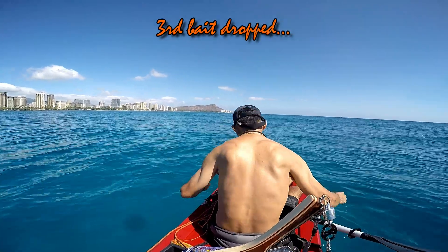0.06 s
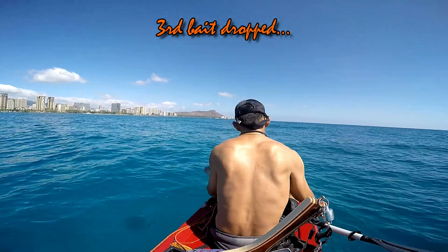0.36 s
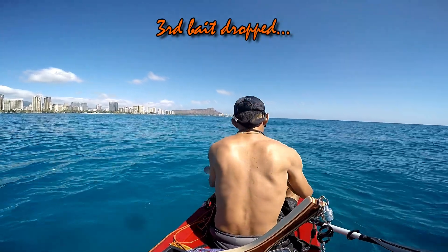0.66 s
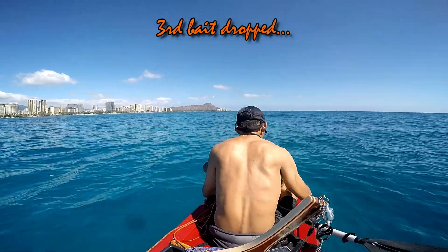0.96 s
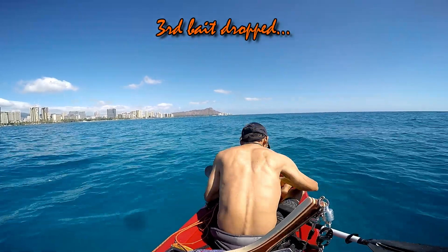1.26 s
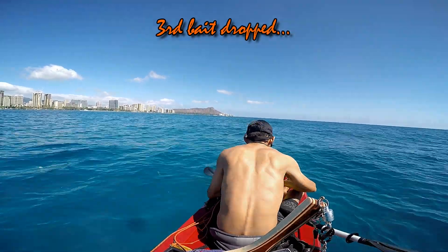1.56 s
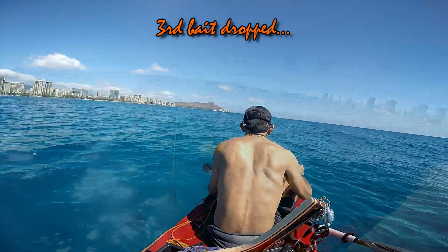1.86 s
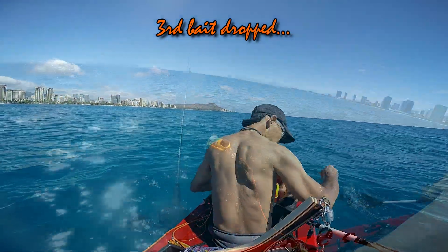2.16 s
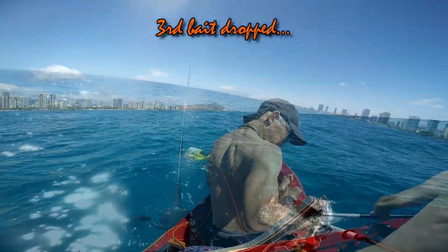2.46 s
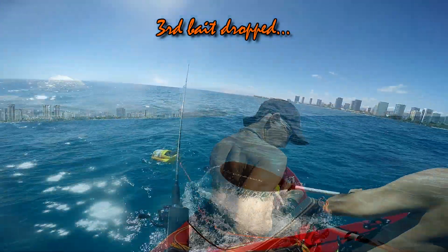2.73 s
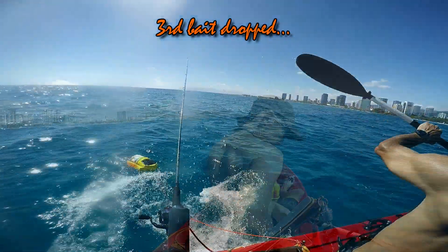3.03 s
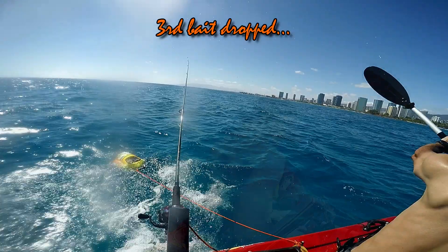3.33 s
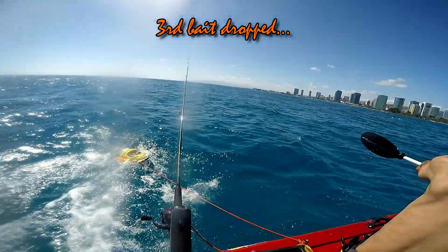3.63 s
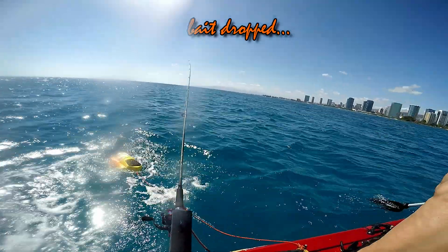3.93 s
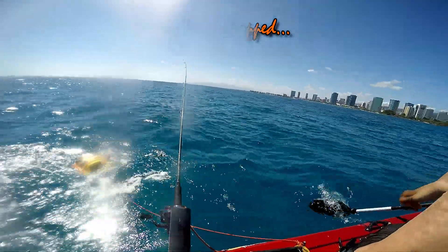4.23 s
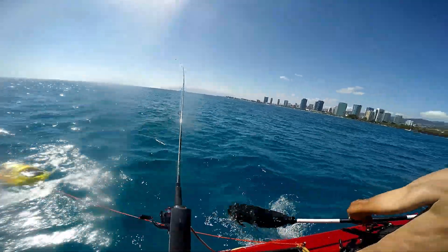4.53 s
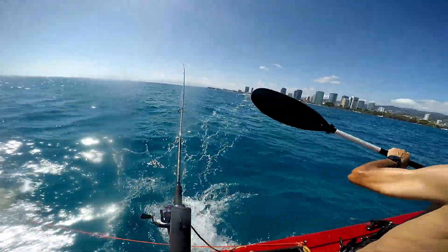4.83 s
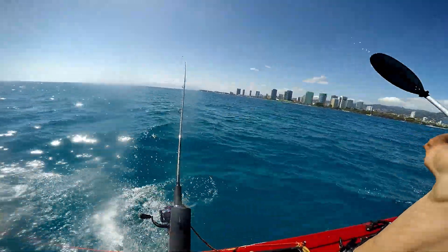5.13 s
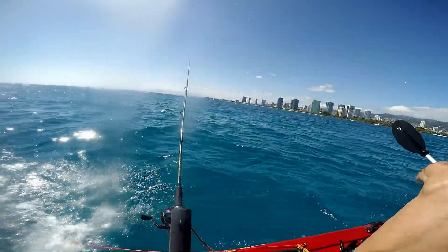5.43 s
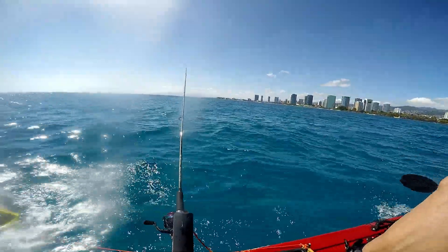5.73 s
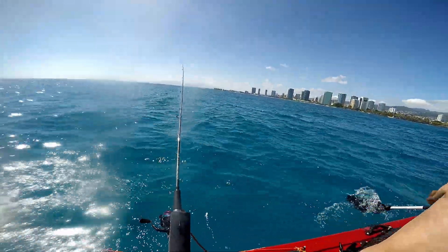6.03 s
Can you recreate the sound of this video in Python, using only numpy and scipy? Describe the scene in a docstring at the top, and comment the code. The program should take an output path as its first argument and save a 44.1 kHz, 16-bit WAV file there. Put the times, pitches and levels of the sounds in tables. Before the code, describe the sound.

Wavelets lap at a drifting plastic kayak, then an abrupt change to paddling, with splashes, gurgling water and hollow hull thumps.

```python
"""Wavelets lap and gear knocks on the deck of a drifting plastic kayak, out at sea.
The scene cuts abruptly to the kayak already being paddled: water churns and gurgles along the hollow
hull, spray fizzes, and the paddle and the chop thump the shell. The water sounds through ringing
bubbles, the hull through its struck modes. All is heard close up, from the microphone of a camera in a
waterproof case fixed to the stern; the camera itself whines faintly."""
import sys
import numpy as np
from scipy import signal
from scipy.fft import rfft, irfft, next_fast_len
from scipy.io import wavfile

SR = 44100
rng = np.random.default_rng(int(sys.argv[2]) if len(sys.argv) > 2 else 0)


def put_to_file(sound):
    """Save the sound as 16-bit audio at rate SR, in the file named by the first command-line argument."""
    columns = np.atleast_2d(sound).T  # one column per channel
    safe = np.clip(columns, -1, 1)
    whole_steps = np.round(safe * 32767)
    wavfile.write(sys.argv[1], SR, whole_steps.astype(np.int16))


N = 268128
TIME = np.arange(N) / SR
SCENE_CUT_S = 2.487  # abrupt cut from drifting to the kayak already being paddled
CUTOFF_HZ = 15600  # top of the microphone's range

# swells that shove the hull, then heave under it: (time [s], level [dB], pitch [Hz], length [s])
SWELLS = [(0.0, -22.5, 39.8, 0.093), (0.352, -20.5, 45, 0.32), (0.526, -21, 36, 0.096),
          (0.767, -18.5, 88, 0.083), (0.956, -21.5, 75.6, 0.046), (1.216, -23.5, 54, 0.02),
          (1.422, -20.5, 71, 0.12), (1.537, -19, 38, 0.22), (2.203, -15.5, 60.3, 0.19),
          (2.75, -15, 193, 0.041), (2.775, -8, 110, 0.093), (3.226, -6, 70, 0.085),
          (3.258, -12.5, 55.4, 0.17), (3.676, -15.5, 80, 0.4), (3.978, -17, 139, 0.068),
          (4.784, -5.5, 71.6, 0.11), (4.886, -9.5, 102.2, 0.28), (5.447, -13, 64.4, .08)]
# water thrown by the paddle: (peak time [s], spray level [dB], large drops re spray [dB],
# fizz re spray [dB], build-up [s], fall [s], pitch of the commonest drops [Hz])
SPLASHES = [(2.82, -47, -2.5, -10.5, 0.54, 0.32, 4540), (3.89, -52, 3, -14.5, 0.38, 0.22, 3930),
            (4.74, -51.5, -0.5, -11.5, 0.41, 0.18, 4700), (5.02, -49, -4.5, -7.5, 0.19, 0.2, 4100),
            (5.4, -51.5, -0.5, -8, 0.048, 0.14, 5150), (5.94, -47.5, 6, -13, 0.41, 0.28, 3850)]


def hull_wash():
    """Water heaves under the hollow hull, booms in it and gurgles along it; all grow with the flow."""
    # flow along the hull in the paddling scene: (time [s], level [dB])
    flow = [(2.5, -44), (2.71, -38.5), (2.79, -39.5), (3.54, -42), (3.84, -41), (4.18, -47), (4.49, -47),
            (4.71, -40), (4.95, -34), (5.18, -36), (5.37, -41), (5.63, -43), (6.08, -43.5)]
    # spectra of the heave, the boom and the gurgle: (frequency [Hz], level [dB])
    heave_colour = [(12, -34), (20, 2.5), (43, 1.5), (130, -4.5), (170, -34), (290, -120)]
    boom_colour = [(71, -29.5), (120, -3.5), (158, -8), (253, -15), (290, -40.5), (380, -46), (640, -120)]
    gurgle_colour = [(160, -36.5), (280, -5), (371, -1.5), (420, 3), (605, -9.5), (659, 2), (680, 1),
                     (886, -9), (1160, -13), (1260, -24), (1800, -47), (2340, -46), (3960, -120)]
    drifting_db, cruising_db = -59, -42  # the flow at rest and at an ordinary pace
    flow_db = np.interp(TIME, *np.transpose(flow))
    pace_db = np.where(TIME < SCENE_CUT_S, drifting_db, flow_db) - cruising_db
    swell = surges([(s, level_db, length_s) for s, level_db, _, length_s in SWELLS])
    heaves = bubble_cloud(per_s=290, low_hz=25.1, high_hz=131.5, cycles=3.3, spread_db=1.5, clump_db=1)
    booms = bubble_cloud(per_s=280, low_hz=108.3, high_hz=308, cycles=5.2, spread_db=4.5, clump_db=0.5)
    gurgles = bubble_cloud(per_s=900, low_hz=280.8, high_hz=1924, cycles=27.4, spread_db=2, clump_db=2.5)
    heave_gain = np.hypot(from_db(-37.5 + 0.45 * pace_db), from_db(-14.5) * swell)
    boom_gain = np.hypot(from_db(-43 + 0.97 * pace_db), from_db(-26.5) * swell)
    gurgle_gain = from_db(-42.5 + 1.087 * pace_db)
    return (heave_gain * coloured(heaves, heave_colour) + boom_gain * coloured(booms, boom_colour)
            + gurgle_gain * coloured(gurgles, gurgle_colour))


def hull_knocks(travel_s, contact_s, scatter_db):
    """Blows ring the hull; bending waves run faster at high pitch, so the clack leads the thump."""
    # blows: (time [s], panel knock [dB], brightness [dB/octave], whole-shell thump [dB])
    blows = [(0.133, -36.5, 5, -59), (0.826, -24, 8, -28.5), (0.859, -35, -16, -35.5), (0.927, -38, 0, -49),
             (1.102, -25.5, -8, -41), (1.592, -27, 4.5, -42), (1.724, -32.5, -13.5, -60),
             (2.231, -32.5, -6, -34), (2.383, -49, -4, -30), (2.6, -9.5, -10.5, -10.5),
             (2.629, -30.5, 2.5, -37), (2.662, -51.5, 10, -34.5), (2.709, -36, -1, -54.5),
             (3.188, -21.5, -15.5, -21), (3.341, -41, -3, -55), (3.352, -33, -1.5, -49),
             (3.385, -52, 6, -29), (3.509, -25.5, -9.5, -41), (3.738, -41.5, 1.5, -21.5),
             (4.099, -23, -12.5, -16.5), (4.215, -33.5, -10, -39), (4.332, -37, -2.5, -31),
             (5.296, -31.5, -2, -60), (5.608, -32.5, 2.5, -28.5), (5.734, -25, -9, -17),
             (5.921, -49, -11, -29.5), (6.001, -20, -7.5, -21)]
    # modes of the plastic hull: (frequency [Hz], level [dB], t60 [s])
    modes = [(54, -7, 0.12), (115.5, 2, 0.086), (138, 7, 0.049), (188.6, -3.5, 0.074), (307, -4.5, 0.0063),
             (425, 0.5, 0.041), (613.5, -3, 0.021), (668.2, -4, 0.08), (770, 7, 0.015), (772, -32, 0.17),
             (1374, 1, 0.016), (1686, 3.5, 0.012), (1780, -35, 0.2), (1940, -33, 0.094),
             (2257, -3.5, 0.024), (2920, 6.5, 0.007), (4800, -25, 0.005)]
    shell_hz, panel_hz = 170, 380  # shell modes lie below the first, panel modes above the second
    pivot_hz, contact_hz = 594, 1670  # brightness tilts the modes between these
    out, t = np.zeros(N), np.arange(SR // 3) / SR
    hz, mode_db, t60 = np.transpose(modes)[:, :, None]
    delay_s = travel_s * (np.sqrt(hz[1] / hz) - np.sqrt(hz[1] / hz[-1]))
    age = np.maximum(t - delay_s, 0)
    side = np.where(hz < panel_hz, -1, 1)  # the whole shell swings against the struck panel
    rings = side * np.sin(2 * np.pi * hz * age) * from_db(mode_db - 60 * age / t60)
    attack = 1 - np.exp(-age / contact_s)
    panel_share = np.interp(np.log(hz), np.log([shell_hz, panel_hz]), [0, 1])
    octaves = np.log2(np.clip(hz, pivot_hz, contact_hz) / pivot_hz)
    contact_db = -15 * np.maximum(np.log2(hz / contact_hz), 0)  # a finite contact drives top modes less
    for s, knock_db, brightness_db, thump_db in blows:
        panel_db = knock_db + brightness_db * octaves + contact_db
        blow_db = panel_share * panel_db + (1 - panel_share) * thump_db
        blow_db += scatter_db * rng.standard_normal(hz.shape)
        add(out, s, np.sum(rings * attack * from_db(blow_db), axis=0))
    return out


def swell_shoves():
    """Each swell shoves the hollow hull: a low thud of a few cycles."""
    return pings([row[:3] for row in SWELLS], cycles=3.8, attack_cycles=0.5, rise=0.083)


def plops():
    """Large air pockets close and drops land; each bubble climbs in pitch as it nears the surface."""
    # single bubbles: (time [s], level [dB], pitch [Hz])
    pockets = [(1.408, -41, 360), (1.523, -38.5, 308), (1.548, -40.5, 420), (2.495, -32, 683),
               (2.88, -26.5, 686), (3.54, -32, 613), (3.814, -22.5, 847), (3.826, -29.5, 345),
               (3.906, -23.5, 354), (3.922, -25, 380), (3.955, -26, 338), (4.008, -33, 430),
               (4.16, -32.5, 338), (4.486, -22.5, 659), (5.045, -32, 425), (5.153, -25, 430),
               (5.083, -29, 745), (5.171, -21, 643), (5.993, -18.5, 710)]
    return pings(pockets, cycles=34, attack_cycles=0.068, rise=0.11)


def paddle_spray():
    """In the paddling scene drops fall back on the sea, a few plink or tick clearly, and foam fizzes."""
    # spectra of large drops, small drops and foam: (frequency [Hz], level [dB])
    splash_colour = [(760, -31), (1300, -4), (1590, -5), (1940, -6.5), (2270, 1.5), (2660, -1.5),
                     (2900, -4.5), (3600, 0.5), (4680, 6), (7920, -120)]
    patter_colour = [(2060, -59), (3500, -7), (4450, 5.5), (4820, -3), (5390, -1), (5760, 2), (6530, -6),
                     (6620, -9), (7000, -6), (9100, -35), (15400, -120)]
    fizz_colour = [(4120, -20), (7000, -3.5), (7470, -1.5), (9010, -11.5), (10900, -10), (12500, -22.5),
                   (14700, -22), (15300, -21), (15800, -39)]
    splash_gain, patter_gain, fizz_gain = white_water()
    after_cut = np.clip((TIME - SCENE_CUT_S) / 0.0026, 0, 1)
    large = bubble_cloud(per_s=2500, low_hz=1240, high_hz=3730, cycles=43, spread_db=2.5, clump_db=3.5)
    small = bubble_cloud(per_s=3500, low_hz=3115, high_hz=7200, cycles=20.5, spread_db=4, clump_db=3.5)
    foam = bubble_cloud(per_s=3400, low_hz=7170, high_hz=CUTOFF_HZ, cycles=110, spread_db=2, clump_db=3.5)
    plinks = bubble_cloud(per_s=60, low_hz=2000, high_hz=5600, cycles=110, spread_db=2, clump_db=2)
    ticks = bubble_cloud(per_s=25, low_hz=5000, high_hz=13000, cycles=7, spread_db=2.5, clump_db=2)
    splash = from_db(-0.43) * splash_gain * (coloured(large, splash_colour) + from_db(-10) * plinks)
    patter = patter_gain * coloured(small, patter_colour) + commonest_drops(q=9.1, gain_db=-4)
    fizz = fizz_gain * (coloured(foam, fizz_colour) + from_db(-8.5) * ticks)
    return after_cut * (splash + patter + fizz)


def white_water(wake_db=-59.5, wake_large_db=1.5, wake_fizz_db=-6.5):
    """Gains of large drops, small drops and fizz: the splashes add in power to the steady wake."""
    power = from_db(wake_db + np.array([[wake_large_db], [0], [wake_fizz_db]])) ** 2
    for s, spray_db, large_db, fizz_db, build_s, fall_s, _ in SPLASHES:
        peaks = from_db(spray_db + np.array([[large_db], [0], [fizz_db]]))
        power = power + (peaks * splash_envelope(s, build_s, fall_s)) ** 2
    return np.sqrt(power)


def commonest_drops(q, gain_db):
    """Each splash breaks mostly into drops of one size, which gives it its own pitch."""
    drops = bubble_cloud(per_s=3000, low_hz=3000, high_hz=6000, cycles=30, spread_db=3, clump_db=2.5)
    out = np.zeros(N)
    for s, spray_db, _, _, build_s, fall_s, hz in SPLASHES:
        ringing = unit_rms(resonate(drops, hz, q))
        out += from_db(spray_db + gain_db) * splash_envelope(s, build_s, fall_s) * ringing
    return out


def lapping():
    """Each wavelet swells quickly against the hull and drains away in a rush of small bubbles."""
    # wavelets: (time [s], level [dB], length [s])
    wavelets = [(0.169, -48.5, 0.064), (0.42, -53, 0.14), (0.608, -47, 0.019), (0.951, -49.5, 0.05),
                (1.118, -53, 0.064), (1.394, -54.5, 0.059), (1.52, -58, 0.08), (1.76, -47.5, 0.11),
                (2.195, -43.5, 0.14), (2.36, -46, 0.11), (2.5, -37, 0.29), (3.812, -43, 0.042),
                (3.905, -40.5, 0.11), (4.408, -37, 0.053), (4.76, -38, 0.18), (5.17, -40.5, 0.26)]
    # spectrum of their bubbles: (frequency [Hz], level [dB])
    lap_colour = [(180, -50), (300, 4), (854, 6), (1110, -2.5), (2510, -12.5), (2980, -8.5), (3400, -23),
                  (4420, -57), (7480, -120)]
    slop = bubble_cloud(per_s=970, low_hz=280, high_hz=3500, cycles=15, spread_db=1, clump_db=2)
    return surges(wavelets) * coloured(slop, lap_colour)


def drops_on_case(t60, q, dull_hz):
    """Flung drops burst right at the microphone, each a short crackle; the case dulls their top."""
    # drops hitting the case: (time [s], level [dB], pitch [Hz])
    hits = [(0.5557, -51, 5550), (0.6205, -57, 6290), (2.6714, -38.5, 4530), (3.8494, -28, 5340),
            (3.862, -35, 5700), (4.098, -34.5, 2610), (4.338, -35, 4760), (4.4808, -29, 2460),
            (5.1484, -36, 2880), (5.645, -49, 7840), (5.945, -38, 3930)]
    out, t = np.zeros(N), np.arange(SR // 10) / SR
    for s, level_db, hz in hits:
        burst = rng.standard_normal(len(t)) * from_db(-60 * t / t60)
        crackle = resonate(burst, hz, q)
        add(out, s, from_db(level_db) * crackle / np.abs(crackle).max())
    return signal.sosfilt(signal.butter(2, dull_hz, fs=SR, output="sos"), out + 1e-18)


def camera_noise(whine_hz, frame_hz):
    """Electronic hiss, a thin whine that restarts every frame, its octave, and a faint pip a frame."""
    # spectrum of the hiss: (frequency [Hz], level [dB])
    hiss_colour = [(120, -36), (200, 2), (817, -13), (1120, -11.5), (5370, -18), (6450, -17), (7070, -22.5),
                   (11800, -28.5), (12900, -25), (15800, -56)]
    hiss = from_db(-59) * coloured(rng.standard_normal(N), hiss_colour)
    phase = 2 * np.pi * whine_hz * (TIME % (1 / frame_hz))
    whine = from_db(-59.5) * resonate(np.sin(phase), whine_hz, q=22)
    octave = from_db(-82) * np.sin(2 * phase)
    gate = np.maximum(np.sin(2 * np.pi * frame_hz * TIME), 0) ** 2
    pips = from_db(-66.5) * gate * np.sin(2 * np.pi * 8570 * TIME + 1.3 * wander(40))
    return hiss + whine + octave + pips


def bubble_cloud(per_s, low_hz, high_hz, cycles, spread_db, clump_db):
    """Bubbles of many sizes, born in clumps, each dying by 60 dB over `cycles` periods; rms 1."""
    pitches = np.geomspace(low_hz, high_hz, 24)
    born = rng.random(N) < per_s * from_db(clump_db * wander(14)) / SR
    strength = from_db(spread_db * np.minimum(rng.exponential(1, N), 4))
    kicks = born * strength * rng.choice([-1, 1], N)
    pitch_index = rng.integers(0, len(pitches), N)
    out = np.zeros(N)
    for k, hz in enumerate(pitches):
        decay = from_db(-60 * hz / (cycles * SR))
        turn = decay * np.cos(2 * np.pi * hz / SR)
        out += hz * signal.lfilter([1, -turn], [1, -2 * turn, decay ** 2], kicks * (pitch_index == k) + 1e-18)
    return unit_rms(out)


def pings(rows, cycles, attack_cycles, rise):
    """Pockets of air or water swell, ring and die, their pitch climbing by the fraction `rise`."""
    out = np.zeros(N)
    for s, level_db, hz in rows:
        life_s = cycles / hz
        t = np.arange(int(life_s * SR) + 2) / SR
        envelope = (1 - np.exp(-t * hz / attack_cycles)) * from_db(-60 * t / life_s)
        ring = envelope * np.sin(2 * np.pi * hz * t * (1 + rise * t / life_s / 2))
        add(out, s, from_db(level_db) * ring / np.abs(ring).max())
    return out


def surges(rows):
    """Gain of waves that swell quickly and drain away."""
    gain = np.zeros(N)
    for s, level_db, length_s in rows:
        age = np.maximum(TIME - s, 0) / (length_s / 4)
        gain += from_db(level_db) * age * np.exp(1 - age)
    return gain


def splash_envelope(s, build_s, fall_s):
    """A splash builds up to its peak at time s and falls away."""
    return np.exp(-np.abs(TIME - s) / np.where(TIME < s, build_s, fall_s))


def coloured(x, colour):
    """Causal filter with the given spectrum, falling 30 dB an octave past its ends; rms 1."""
    size = next_fast_len(N + SR // 2)
    octave = np.log2(np.maximum(np.arange(size // 2 + 1) * SR / size, 1))
    hz, db = np.transpose(colour)
    outside = np.maximum(np.log2(hz[0]) - octave, 0) + np.maximum(octave - np.log2(hz[-1]), 0)
    shape_db = np.maximum(np.interp(octave, np.log2(hz), db) - 30 * outside, -100)
    cepstrum = irfft(np.log(from_db(shape_db)), size)
    response = np.exp(2 * rfft(cepstrum[:size // 2], size))  # minimum phase
    return unit_rms(irfft(rfft(x, size) * response, size)[:N])


def wander(rate_hz):
    """Smooth random motion with spread 1."""
    hop, settle = 40, 2000
    pole = np.exp(-2 * np.pi * rate_hz * hop / SR)
    noise = rng.standard_normal(N // hop + settle + 2)
    slow = signal.lfilter([1], [1, -2 * pole, pole ** 2], noise)[settle:]
    return np.interp(np.arange(N) / hop, np.arange(len(slow)), unit_rms(slow))


def resonate(x, hz, q):
    """Pass a band hz / q wide."""
    return signal.lfilter(*signal.iirpeak(hz, q, fs=SR), x)


def from_db(db):
    """Decibels to gain."""
    return 10 ** (np.asarray(db) / 20)


def unit_rms(x):
    """Scale to rms 1."""
    return x / np.sqrt(np.mean(x ** 2) + 1e-20)


def add(out, s, sound):
    """Mix a sound in at time s."""
    start = int(np.clip(s * SR, 0, N - 1))
    out[start:start + len(sound)] += sound[:N - start]


def scene():
    """Everything reaches one microphone on the stern, close to the water."""
    knocks = from_db(3.5) * hull_knocks(travel_s=0.006, contact_s=0.00061, scatter_db=4)
    drops = from_db(4.5) * drops_on_case(t60=0.037, q=3.125, dull_hz=8450)
    laps = from_db(-0.5) * lapping()
    sea = hull_wash() + from_db(-9) * swell_shoves() + from_db(1.5) * plops() + paddle_spray()
    return (sea + knocks + laps + drops + camera_noise(whine_hz=6308.4, frame_hz=29.97))[None]


def record(dry):
    """The microphone passes no steady pressure; the top is cut steeply."""
    sound = signal.sosfilt(signal.butter(1, 15, "high", fs=SR, output="sos"), dry)
    return signal.sosfilt(signal.ellip(10, .1, 80, CUTOFF_HZ, fs=SR, output="sos"), sound)


dry = scene()
out = record(dry)
put_to_file(out)
```